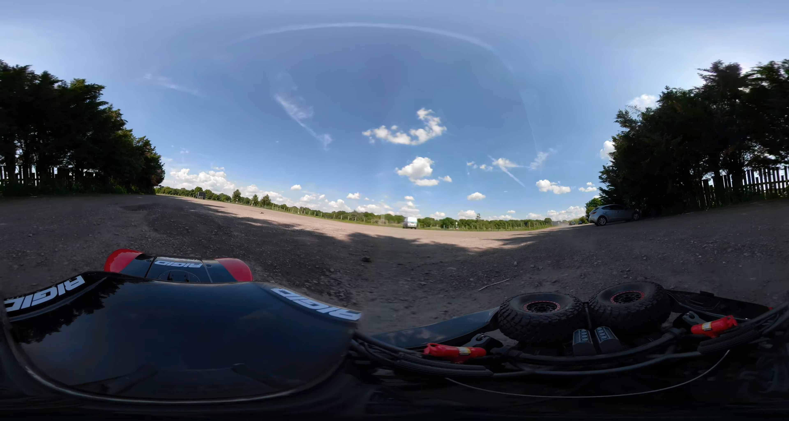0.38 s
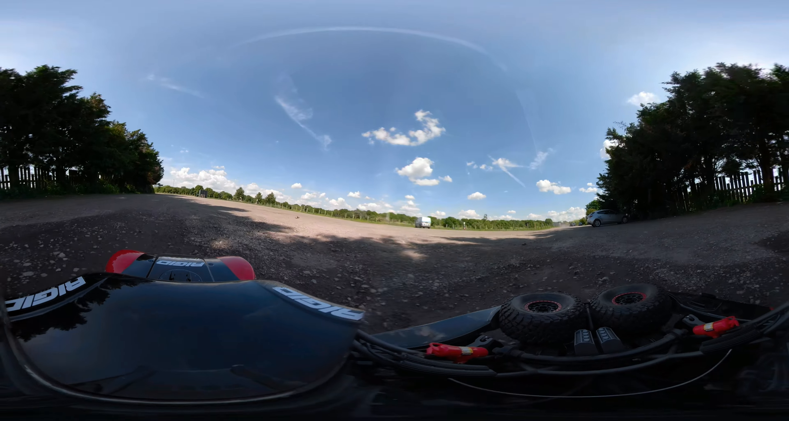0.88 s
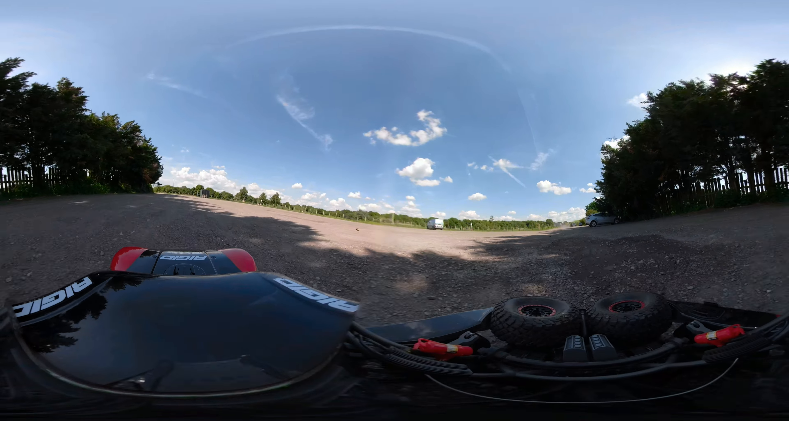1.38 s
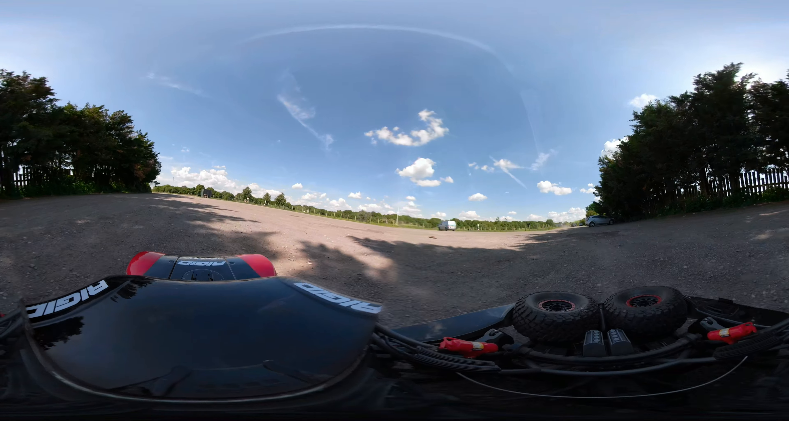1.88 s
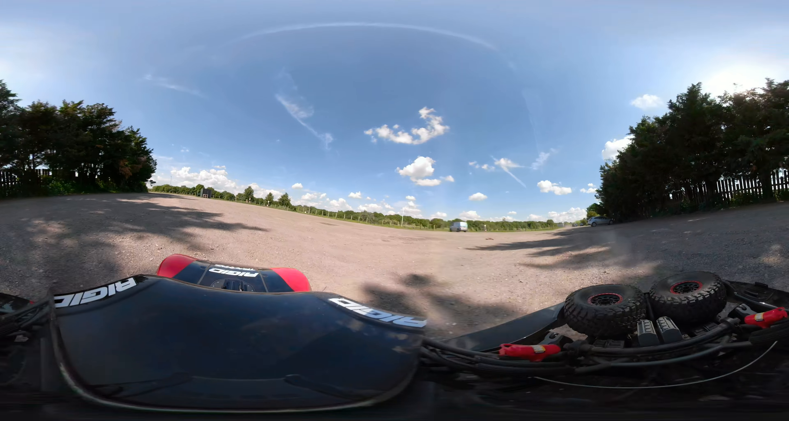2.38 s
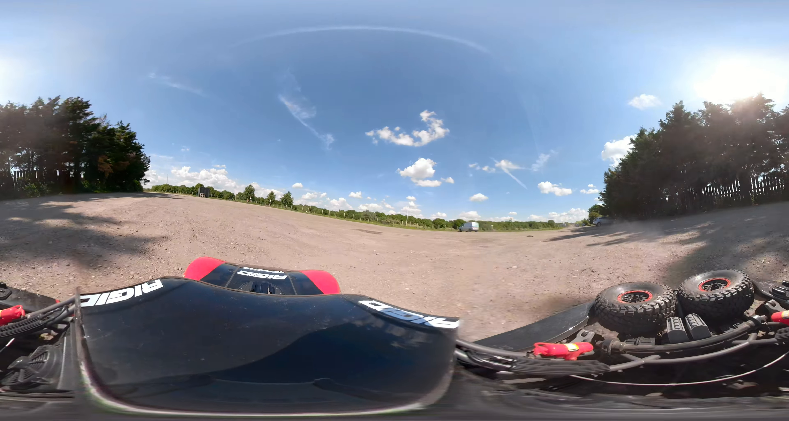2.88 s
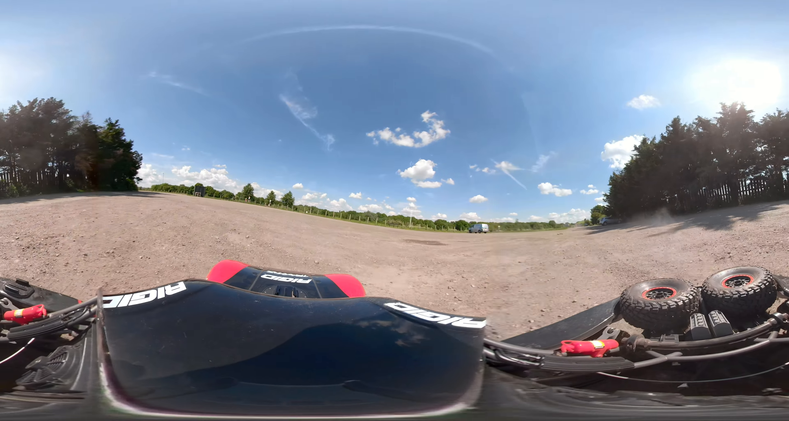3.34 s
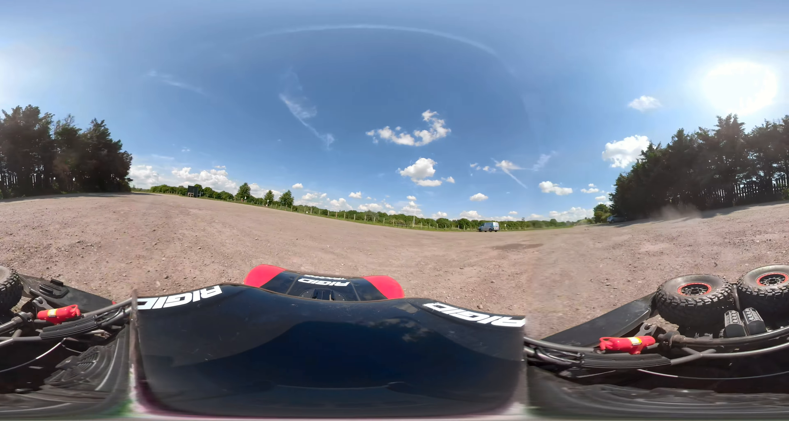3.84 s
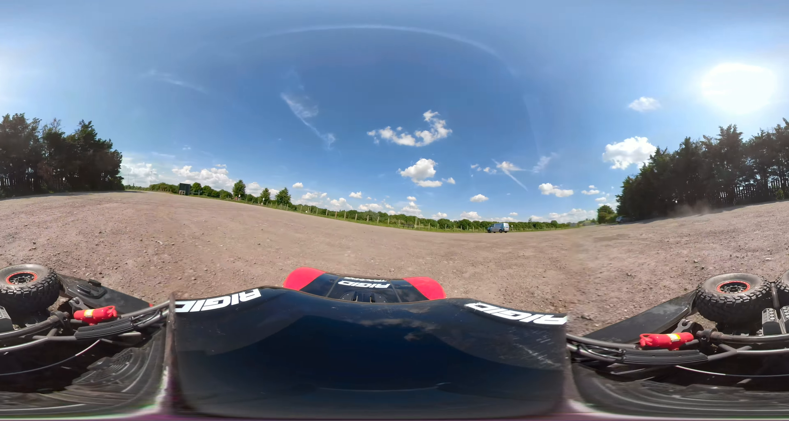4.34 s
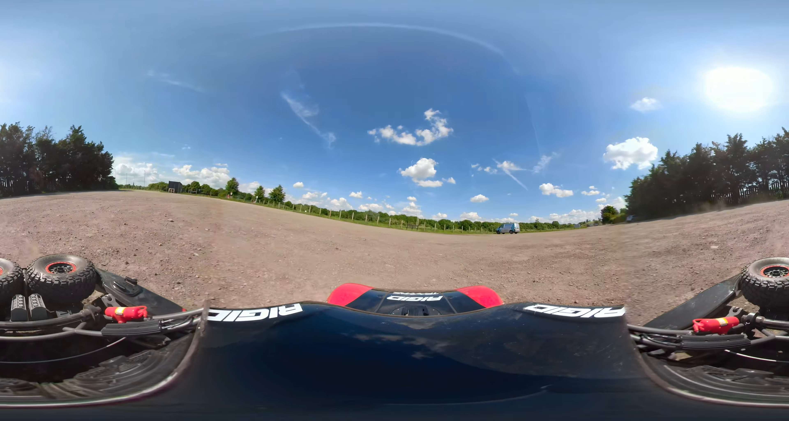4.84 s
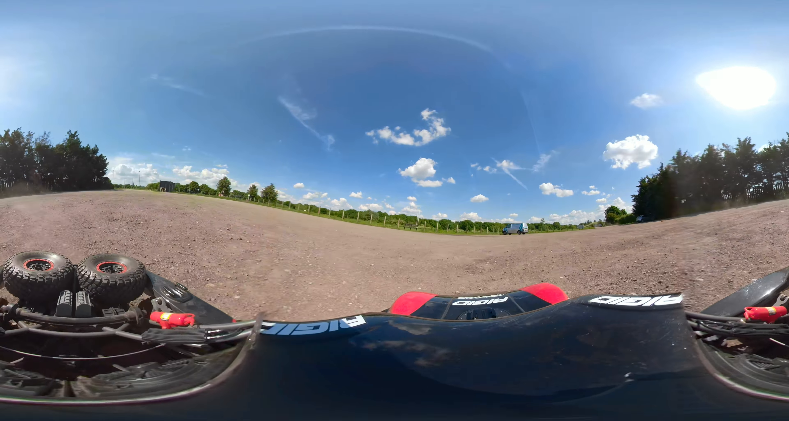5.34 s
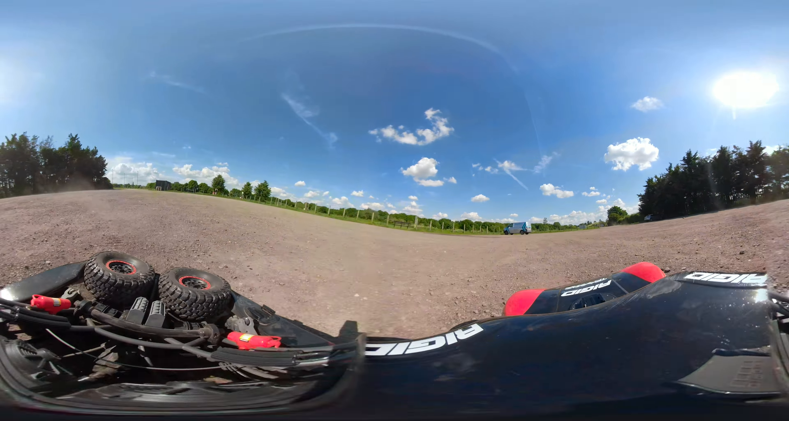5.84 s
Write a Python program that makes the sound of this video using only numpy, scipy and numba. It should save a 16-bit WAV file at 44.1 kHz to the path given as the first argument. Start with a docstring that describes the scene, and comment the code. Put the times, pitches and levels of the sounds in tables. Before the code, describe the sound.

A small electric remote-controlled truck drives over loose gravel, heard from its roof. Gear whine and motor hum start high and raspy, peak near two seconds, then settle lower. Chassis rattle, tyre roar and low rumble run throughout, with stones knocking. Wheels break loose briefly at about four and a half seconds and again at the end, pitch leaping.

```python
"""Electric off-road truck on gravel

A small electric truck runs over gravel, heard through a camera clamped to its roof.
The motor shaft hums as drifting sines; gear teeth whine as blurred multiples of the mesh pitch.
Swelling noise and ticks rattle and rasp in the chassis, spray hisses, stones knock and pebbles ping.
Filtered noise makes the rumbling mount, tyre roar and drumming shell; tyre lugs drone below the whine.
Twice the wheels break loose: the pitch leaps and the load rises. A gain control evens the level."""
import sys
import numpy as np
from scipy import signal
from scipy.fft import rfft, irfft, next_fast_len
from scipy.io import wavfile
from scipy.ndimage import uniform_filter1d
from numba import njit

SR = 44100
rng = np.random.default_rng(int(sys.argv[2]) if len(sys.argv) > 2 else 0)


def convert_level_to_amplitude(level_db):
    """Map a level in decibels to its linear amplitude factor."""
    exponent = np.asarray(level_db, float) / 20
    return 10 ** exponent


def file_out(sig):
    """Save sig as 16-bit WAV at sys.argv[1]."""
    # one column per channel
    cols = np.atleast_2d(sig).T
    # limit, then scale
    lim = np.clip(cols, -1, 1)
    pcm = np.round(lim * 32767).astype(np.int16)
    wavfile.write(sys.argv[1], SR, pcm)


N = 274302  # length in samples
CRUISE_HZ = 190  # shaft speed from which speed effects count
TURNS_PER_WHEEL_TURN = 13.6  # shaft turns


def level(x, db):
    """Set the rms level."""
    return x * convert_level_to_amplitude(db) / np.sqrt(np.mean(x ** 2))


def play(table):
    """The columns of a table after its time column, one value per sample."""
    s, *columns = np.transpose(table)
    return [np.interp(np.arange(N) / SR, s, c) for c in columns]


def walk(rate):
    """Random levels held 1 / rate s and slewed twice; spread 1."""
    hold = max(int(SR / rate), 1)
    steps = np.repeat(rng.standard_normal(N // hold + 1), hold)
    slewed = uniform_filter1d(uniform_filter1d(steps, hold), hold)[:N]
    return slewed / slewed.std()


def pitch_drift(width_hz, smooth):
    """Random phase walk in radians that spreads a tone over width_hz; smooth is in samples."""
    drift = np.cumsum(np.sqrt(2 * np.pi * width_hz / SR) * rng.standard_normal(N))
    return uniform_filter1d(drift, size=smooth)


def swell(start, rise, hold, fall):
    """A shape from 0 to 1 and back: rise, hold, fall in s."""
    corners = start + np.cumsum([0, rise, max(hold, 0), fall])
    return np.interp(np.arange(N) / SR, corners, [0, 1, 1, 0])


def resonance(hz, centre, width):
    """Bell that is 1 at the centre and 1/2 half a width away."""
    return 1 / (1 + (2 * (hz - centre) / width) ** 2)


def colour(x, points, modes=()):
    """Causal minimum-phase filter with the given spectrum and resonances."""
    size = 8192
    f = np.arange(size // 2 + 1) * SR / size + 1
    hz, db = np.transpose(points)
    gain_db = np.interp(np.log(f), np.log(hz), db)
    for centre, width, lift in modes:
        gain_db = gain_db + lift * resonance(f, centre, width)
    # folding the cepstrum onto positive time makes the response causal
    cepstrum = irfft(np.log(convert_level_to_amplitude(gain_db)))
    cepstrum[1:size // 2] *= 2
    cepstrum[size // 2 + 1:] = 0
    return signal.fftconvolve(x, irfft(np.exp(rfft(cepstrum))))[:N]


@njit
def band(x, hz, width):
    """State-variable band-pass."""
    out, band_state, low_state = np.empty(len(x)), 0., 0.
    g, damping = np.tan(np.pi * hz / SR), width / hz
    for i in range(len(x)):
        v = (band_state + g * (x[i] - low_state)) / (1 + g * (g + damping))
        band_state = 2 * v - band_state
        low_state = low_state + 2 * g * v
        out[i] = damping * v
    return out


@njit
def follower(x, attack, release):
    """Envelope that rises fast and falls slowly."""
    envelope, out = abs(x[0]) + .15, np.empty(len(x))
    for i in range(len(x)):
        envelope += (abs(x[i]) - envelope) * (attack if abs(x[i]) > envelope else release)
        out[i] = envelope
    return out


# course of the drive: start_s, shaft_hz, gear_load_db, gravel_looseness_db
DRIVE = [(0, 229.3, 1.5, -3.5), (.3, 223, -5.5, -2), (.6, 215.9, 0, -2), (.85, 219, 4, 0.5),
         (1.25, 228.8, 6.5, 1.5), (1.6, 234.2, 10.5, 0.5), (1.8, 234, 8.5, -1.5), (1.9, 221, -5.5, -2),
         (2.3, 209.1, 1, -2.5), (2.6, 200.6, -4, -1.5), (3.0, 194, -6.5, 0.5), (3.3, 190.6, -6, 0.5),
         (3.7, 190, -2, 1), (4.1, 190.1, -2.5, 3), (4.5, 189.3, -4.5, 1), (4.9, 197.1, -9, -0.5),
         (5.3, 187, -21, -3), (5.5, 188.4, -8.5, 1.5), (5.7, 182.8, -14, 0), (5.97, 187.9, -4, 3.5),
         (6.22, 189.2, 2.5, 3)]
# wheels breaking loose under throttle: start_s, spin_up_s, length_s, speed_gain_hz, load_gain_db
WHEELSPIN = [(4.563, .12, .22, 65.23, 15.5), (6.009, .18, .3, 69.5, 8)]
SPIN_DOWN_S, BITE_S, SPRAY_PER_LOAD = .12, 0.09, 0.41  # the last is gravel dB per dB of load gain


def drive():
    """Shaft speed, gear load and gravel looseness, with the wheelspins on top."""
    turns, load_db, gravel_db = play(DRIVE)
    for start, rise, length, gain_hz, gain_db in WHEELSPIN:
        turns = turns + gain_hz * swell(start, rise, length - rise, SPIN_DOWN_S)
        bite_db = gain_db * swell(start, BITE_S, length - BITE_S, BITE_S)
        load_db = load_db + bite_db
        gravel_db = gravel_db + SPRAY_PER_LOAD * bite_db
    return turns, load_db, gravel_db


def spin():
    """Shaft speed in Hz that the wheelspins add to the steady drive."""
    return drive()[0] - play(DRIVE)[0]


# ringing modes of the chassis: pitch_hz, width_hz, lift_db
CHASSIS = [(670, 80, 5), (762, 90, 7), (1305, 90, 7), (1705, 90, 7), (1795, 100, 5), (2140, 120, 6),
           (2700, 260, 3), (4130, 300, 5.5), (5310, 200, 5), (6750, 300, 3), (7170, 300, 5), (7690, 150, 5)]
# broad colour from chassis to camera: pitch_hz, gain_db
HOUSING = [(300, -17), (450, -2), (600, -2.5), (850, 2), (1050, 0.5), (1500, -5.5), (2000, -10),
           (3150, -22.5), (3700, -27), (4500, -31), (6150, -33), (8000, -30.5), (8500, -45.5),
           (10000, -55.5), (13000, -44), (15000, -54.5)]


def chassis(force):
    """What the chassis and the camera housing make of a force."""
    return colour(force, HOUSING, CHASSIS)


def treble(x):
    """The part above the chassis' main modes."""
    return signal.sosfilt(signal.butter(3, 3600, "high", fs=SR, output="sos"), x)


def surge(ticks_db):
    """Noise and dense ticks that swell and sink at random, as over bumps."""
    ticks = (rng.random(N) < 1500 / SR) * rng.standard_normal(N)  # about 1500 a second
    ticks = ticks * convert_level_to_amplitude(2.9 * rng.standard_normal(N))
    bumps_db = 1.4 * walk(35) + 1.3 * walk(70)
    bumps_db = bumps_db - uniform_filter1d(bumps_db, size=SR // 9)
    # spinning wheels scrape evenly
    bumps_db = bumps_db * np.exp(-spin() / 30)
    return (level(rng.standard_normal(N), 0) + level(ticks, ticks_db)) * convert_level_to_amplitude(bumps_db)


# spectrum of the tyre roar: pitch_hz, relative_level_db (per Hz)
GROUND = [(9, -39), (18, -9.5), (28, -5.5), (37, -9), (47, -20.5), (60, -7), (80, -1.5), (157, -8.5),
          (201, -8.5), (304, -13.5), (378, -23.5), (434, -22.5), (506, -35.5), (600, -44), (1300, -120)]
# lower and upper mode of the camera mount: pitch_hz, width_hz (of the first filter pass)
MOUNT = [(63., 14.4), (81., 16.3)]
# moments when the rumble happens to swell or dip: peak_s, lower_mode_db, upper_mode_db, tyre_roar_db
RUMBLE_SWELLS = [(.03, 8.5, -4, 0.5), (.22, 2, 8, -1.5), (.33, -11, 4.5, 2.5), (.6, 5, 9, 5.5),
                 (.85, 6, 3.5, 0), (1.231, 4, -0.5, -2.5), (1.47, -15, 10, -1.5), (1.64, -3, 6, -0.5),
                 (1.87, -4, 4, 1.5), (2.061, 2.5, 2, 9.5), (2.27, 6.5, 6.5, 1.5), (2.55, 5, 2.5, 0.5),
                 (2.89, -8, 5.5, 0), (2.94, 6.5, 4, -2), (3.3, 4, -4.5, -0.5), (3.52, 9, -4, -3.5),
                 (3.68, 2, -7, 4), (4.12, 3, -4, 1.5), (4.25, 2.5, -0.5, -5), (4.38, 1, 5, -4.5),
                 (4.49, 5, 2.5, -7), (4.78, 2.5, 8, 4.5), (4.918, 7.5, 6.5, 0), (5.11, 7, 4.5, 5.5),
                 (5.259, 9, -7, -4), (5.45, -7, 0.5, -1), (5.84, 0.5, -14, 9), (6.17, -7, -2, 5)]
SWELL_RISE_S, SWELL_FALL_S = .04, 0.066
ROCK_DB, ROAR_DB, ROAR_PER_GRAVEL = -20, -17, 0.41  # rms before swells and gravel; dB per dB


def ground():
    """The mount rocks at its own low pitches under a tyre roar; their levels waver by chance."""
    shapes = [swell(s - SWELL_RISE_S, SWELL_RISE_S, 0, SWELL_FALL_S) for s, *_ in RUMBLE_SWELLS]
    *rock_db, roar_db = np.array(RUMBLE_SWELLS)[:, 1:].T @ np.array(shapes)
    roar = colour(rng.standard_normal(N) * convert_level_to_amplitude(1.37 * walk(10)), GROUND)
    out = level(roar, ROAR_DB) * convert_level_to_amplitude(roar_db + ROAR_PER_GRAVEL * drive()[2])
    for (hz, width), db in zip(MOUNT, rock_db):
        rock = band(band(rng.standard_normal(N), hz, width), hz, 1.7 * width)
        # the sway is kept going, so it seldom dies away
        sway = np.abs(signal.hilbert(rock, next_fast_len(N))[:N])
        rock = band(rock / sway ** 1.12, hz, 2.8 * width)
        out = out + level(rock, ROCK_DB) * convert_level_to_amplitude(db + 1.95 * walk(14))
    return out


def shell():
    """The body shell drums steadily in its lowest modes: filtered, gently wavering noise."""
    spectrum = [(400, -27.0), (600, -2.0), (850, -0.5), (1100, -25.5), (4000, -100)]
    drum = colour(rng.standard_normal(N) * convert_level_to_amplitude(0.5 * walk(12)), spectrum, CHASSIS)
    return level(drum, -30)


LUGS_PER_WHEEL, LUG_BLUR_HZ = 18, 25
LUG_DB, LUG_DB_PER_HZ = -36.5, 0.1471  # peak level at cruising speed, and its rise with shaft speed


def lugs():
    """Tyre lugs beat the ground at a blurred pitch that follows the steady speed."""
    turns = play(DRIVE)[0]
    lug_hz = turns * LUGS_PER_WHEEL / TURNS_PER_WHEEL_TURN
    phase = 2 * np.pi * np.cumsum(lug_hz) / SR + pitch_drift(LUG_BLUR_HZ, smooth=200)
    lug_db = LUG_DB + LUG_DB_PER_HZ * (turns - CRUISE_HZ) + 1.6 * walk(24)
    return convert_level_to_amplitude(lug_db) * np.sin(phase)


RATTLE_DB, SPRAY_DB = -29, -44  # rms before gravel and wheelspin
SPRAY_PER_GRAVEL, SPRAY_SPIN_DB_PER_HZ = 0.34, 0.0372  # dB per dB; dB per Hz of wheelspin


def rattle():
    """Loose parts and grit shake the chassis, with gravel spray hissing above them."""
    gravel_db = drive()[2]
    force = surge(ticks_db=-4.0)
    body = level(chassis(force - treble(force)), RATTLE_DB) * convert_level_to_amplitude(gravel_db)
    # coarse and fine grit fly separately
    coarse = signal.sosfilt(signal.butter(3, 6300, "low", fs=SR, output="sos"), surge(ticks_db=-1.5))
    fine = signal.sosfilt(signal.butter(3, 6300, "high", fs=SR, output="sos"), surge(ticks_db=-1.5))
    spray = level(chassis(treble(0.32 * force + coarse + fine)), SPRAY_DB)
    return body + spray * convert_level_to_amplitude(SPRAY_PER_GRAVEL * gravel_db + SPRAY_SPIN_DB_PER_HZ * spin())


RASP_DB, RASP_PER_LOAD, RASP_PER_GRAVEL = -42, 0.6, 1.58  # rms before load and gravel; dB per dB


def gearbox():
    """The gear case rasps in its own modes under load and over loose gravel."""
    _, load_db, gravel_db = drive()
    case = [(300, -59.5), (1050, -19.5), (1300, 6.0), (1700, 11.0), (2200, -4.5),
            (2600, -14.5), (9000, -77.0)]
    rasp = colour(surge(ticks_db=-10.5), case, CHASSIS)
    return level(rasp, RASP_DB) * convert_level_to_amplitude(RASP_PER_LOAD * load_db + RASP_PER_GRAVEL * gravel_db)


# small pebbles on the shell: start_s, pitch_hz, peak_db
PINGS = [(2.096, 4800, -36), (4.763, 4300, -33), (5.86, 6530, -38)]
PING_FALL_S = .002  # also the time to the peak


def pings():
    """Pebbles ring the shell briefly and brightly: sines that swell and die within milliseconds."""
    out, t = np.zeros(N + SR), np.arange(int(.02 * SR)) / SR
    envelope = t / PING_FALL_S * np.exp(1 - t / PING_FALL_S)
    for s, hz, db in PINGS:
        start = int(s * SR)
        out[start:start + len(t)] += convert_level_to_amplitude(db) * envelope * np.sin(2 * np.pi * hz * t)
    return out[:N]


# flung stones: start_s, force_db, hardness_db (treble of the crunch)
STONES = [(0.061, -11, -1), (0.485, -8, -15), (0.985, -12, 0), (1.18, -11, 6), (1.235, -7.5, -9),
          (1.572, -6.5, -2), (1.666, -5, -5), (1.976, -6.5, 7), (2.094, -10, 11), (2.31, -5.5, -12),
          (2.384, -13, 0), (2.402, -2, -11), (2.665, -1.5, 2), (3.166, -7, -10), (3.214, -11, -15),
          (3.533, -7, -8), (3.657, -5.5, -2), (3.679, -8, 5), (3.785, -8.5, -11), (4.171, -7.5, 15),
          (4.4, -2.5, -12), (4.615, -3, 7), (4.891, -1, 1), (5.033, -3, 4), (5.379, -6, -8), (5.517, -1, 3),
          (5.623, -9, -14), (5.818, 3.5, 1), (5.853, -3, -24), (5.962, -1, 9), (5.988, -3.5, 10),
          (6.091, -1.5, -1), (6.195, -5, 10)]
STONE_TOP_HZ = 4000
CRUNCH_RISE_S, CRUNCH_FALL_S = .0028, .0088  # at hardness 0
SOFTER_LASTS_LONGER = .35  # dB of crunch length per dB of softness


def stones():
    """Flung stones knock the chassis: a crunch of several ms, brighter when the stone is hard."""
    force, t = np.zeros(N + SR), np.arange(int(.05 * SR)) / SR
    cracks = rng.standard_normal((len(STONES), len(t)))
    for (s, db, hard_db), crack in zip(STONES, cracks):
        stretch = convert_level_to_amplitude(-SOFTER_LASTS_LONGER * hard_db)
        rise = 1 - np.exp(-t / (CRUNCH_RISE_S * stretch))
        burst = crack * np.exp(-t / (CRUNCH_FALL_S * stretch)) * rise
        dull = uniform_filter1d(burst, size=9)
        start = int(s * SR)
        force[start:start + len(t)] += convert_level_to_amplitude(db) * (dull + convert_level_to_amplitude(hard_db) * (burst - dull))
    return chassis(signal.sosfilt(signal.butter(2, STONE_TOP_HZ, fs=SR, output="sos"), force[:N]))


# shaft tones: rms level, and lift near the pitch where frame or chassis rings
HUM_DB, HUM_LIFT_DB, FRAME_HZ, FRAME_WIDTH_HZ = -33.5, 10.5, 190, 33
HUM_PER_LOAD = .3  # dB per dB
HUM_SPIN_DB_PER_HZ = 0.2043  # freely spinning wheels shake the shaft harder
SECOND_DB, SECOND_DB_PER_HZ = -50, 0.1942  # at cruising speed, and its rise with speed
THIRD_DB, THIRD_LIFT_DB, THIRD_HZ, THIRD_WIDTH_HZ, THIRD_PER_LOAD = -53, 22, 663, 150, 0.48


def hum(phase):
    """The unbalanced shaft hums at its turning rate and twice and three times that."""
    turns = drive()[0]
    steady_hz, steady_load_db, _ = play(DRIVE)
    first_db = HUM_DB + HUM_PER_LOAD * steady_load_db + HUM_SPIN_DB_PER_HZ * spin()
    first_db = first_db + HUM_LIFT_DB * resonance(turns, FRAME_HZ, FRAME_WIDTH_HZ)
    second_db = SECOND_DB + SECOND_DB_PER_HZ * (steady_hz - CRUISE_HZ)
    third_db = THIRD_DB + THIRD_PER_LOAD * steady_load_db
    third_db = third_db + THIRD_LIFT_DB * resonance(3 * turns, THIRD_HZ, THIRD_WIDTH_HZ)
    first = convert_level_to_amplitude(first_db + 2.5 * walk(16)) * np.sin(phase + .55 * walk(25))
    second = convert_level_to_amplitude(second_db + 3 * walk(20)) * np.sin(2 * phase + 1.2 * walk(30))
    third = convert_level_to_amplitude(third_db + 2.5 * walk(30)) * np.sin(3 * phase + 1.3 * walk(45))
    return np.sqrt(2) * (first + second + third)


# tones of the gear mesh: multiple, level_db (before load and chassis)
WHINE = [(1, 0), (2, 4), (3, 7.5), (4, 7), (5, 10), (6, 6)]
WHINE_DB, TEETH_PER_TURN = -37.5, 5.65  # mesh cycles per shaft turn
# with speed the gear pitch blurs and the even multiples fade
BLUR_HZ, BLUR_PER_HZ, SPIN_BLUR_PER_HZ = 17, 0.55, .55
BLUR_GROWTH = .78  # power of the multiple
EVEN_DB, EVEN_DB_PER_HZ, EVEN_SPIN_DB_PER_HZ = 5.5, -0.24, -.03


def whine(phase):
    """Gear teeth whine through the chassis at multiples of the mesh pitch, louder under load."""
    load_db = drive()[1]
    above_cruise_hz, spin_hz = play(DRIVE)[0] - CRUISE_HZ, spin()
    # backlash lets the mesh drift at random, which blurs the higher multiples most
    blur_hz = np.maximum(BLUR_HZ + BLUR_PER_HZ * above_cruise_hz + SPIN_BLUR_PER_HZ * spin_hz, 1)
    drift = pitch_drift(blur_hz, smooth=12)
    mesh = TEETH_PER_TURN * phase
    even_db = EVEN_DB + EVEN_DB_PER_HZ * above_cruise_hz + EVEN_SPIN_DB_PER_HZ * spin_hz
    # the load on the teeth throbs once a wheel turn
    throb_db = 2.5 * np.cos(phase / TURNS_PER_WHEEL_TURN + .8 * walk(4))
    teeth = np.zeros(N)
    for k, db in WHINE:
        tone_db = db + (k % 2 == 0) * even_db + throb_db + 2.0 * walk(60)
        teeth += convert_level_to_amplitude(tone_db) * np.sin(k * mesh + k ** BLUR_GROWTH * drift)
    return chassis(convert_level_to_amplitude(WHINE_DB + load_db) * teeth)


def motor():
    """One slightly unsteady shaft rotation drives both the hum and the gear whine."""
    phase = 2 * np.pi * np.cumsum(drive()[0] * (1 + .006 * walk(15))) / SR
    return hum(phase) + whine(phase)


def scene():
    """All sources add up at the one microphone."""
    return (ground() + shell() + lugs() + rattle() + gearbox() + pings() + stones() + motor())[None]


def low_pass(x):
    """Removes everything above the highest recorded frequency."""
    return signal.sosfilt(signal.butter(12, 15290, fs=SR, output="sos"), x)


def record(dry):
    """Quick gain control, then soft rounding of peaks."""
    loudness = follower(dry[0], 1 / (0.0043 * SR), 1 / (.06 * SR))  # attack 4.3 ms, release 60 ms
    held = dry * (.16 / loudness) ** 0.24
    rounded = np.tanh(1.033 * held) / 1.268
    return low_pass(rounded)


dry = scene()
out = record(dry)
file_out(out)
```